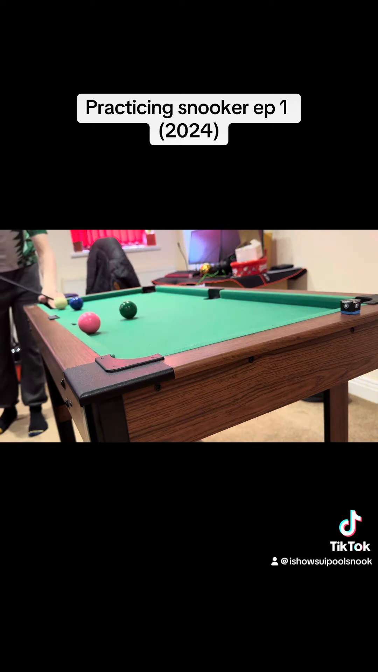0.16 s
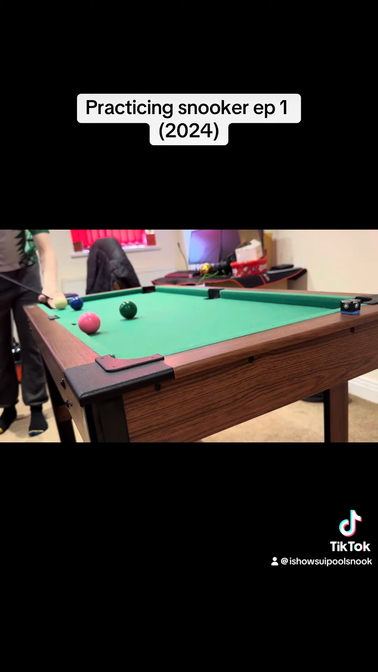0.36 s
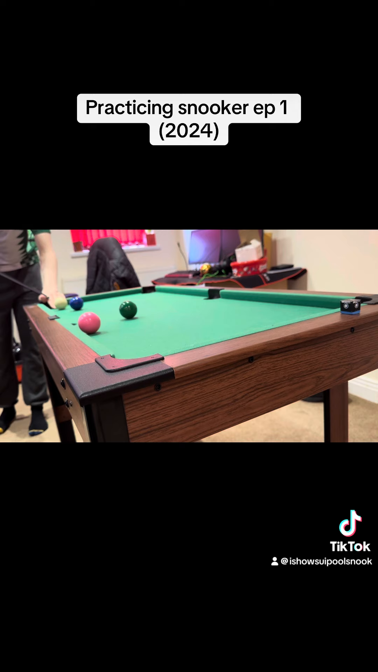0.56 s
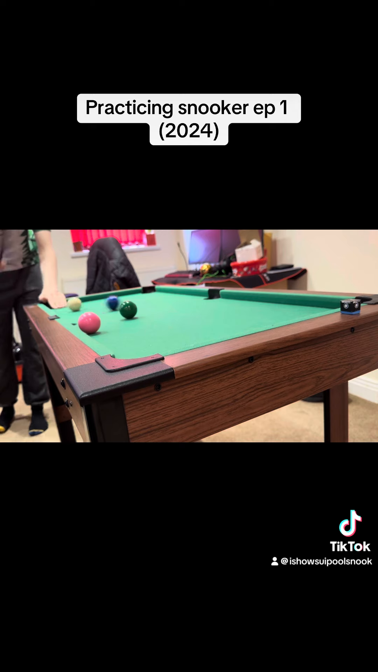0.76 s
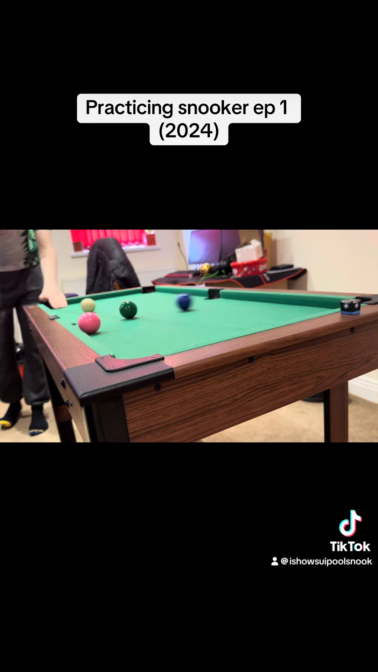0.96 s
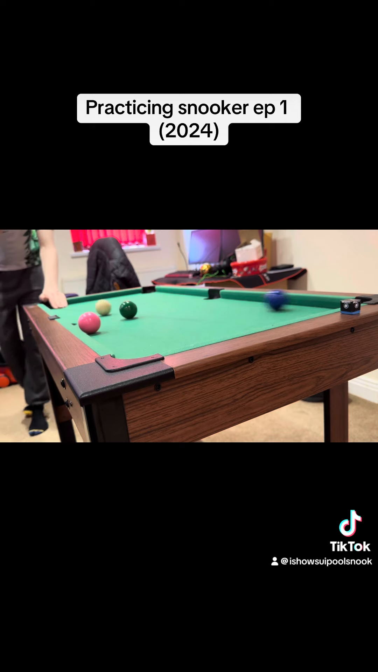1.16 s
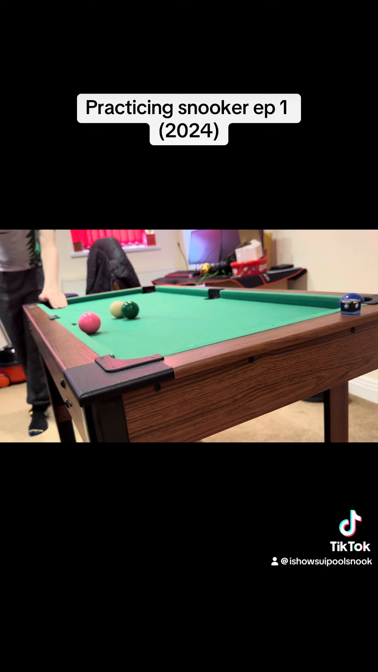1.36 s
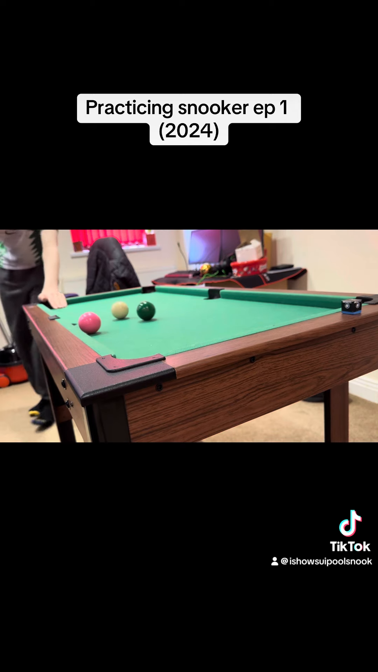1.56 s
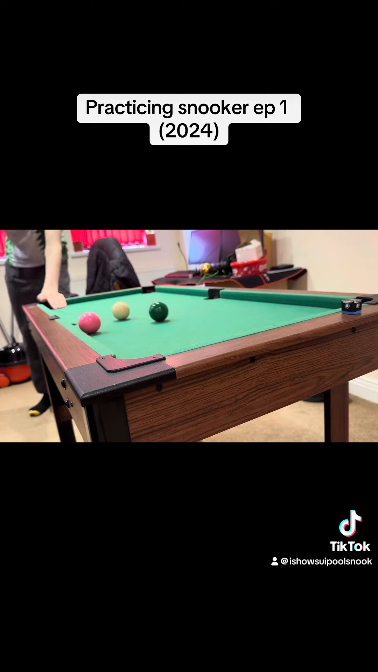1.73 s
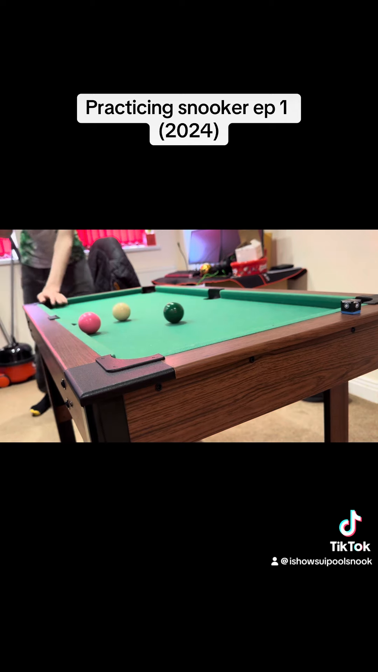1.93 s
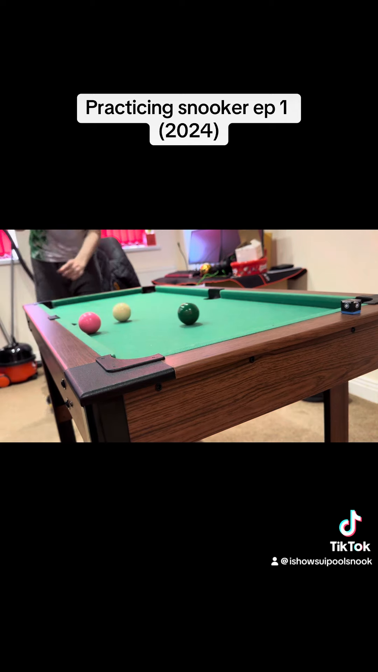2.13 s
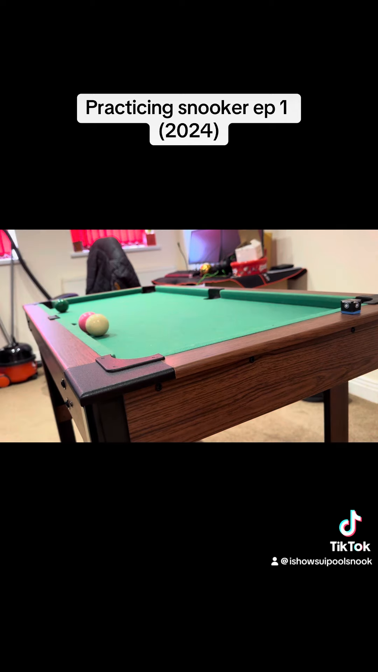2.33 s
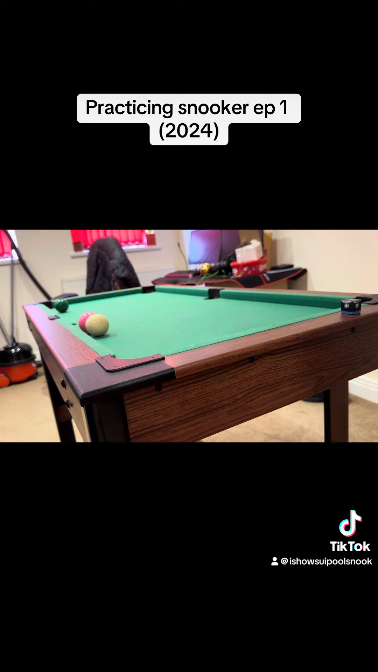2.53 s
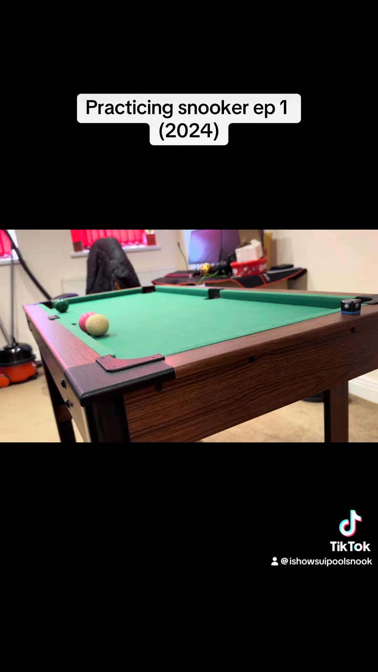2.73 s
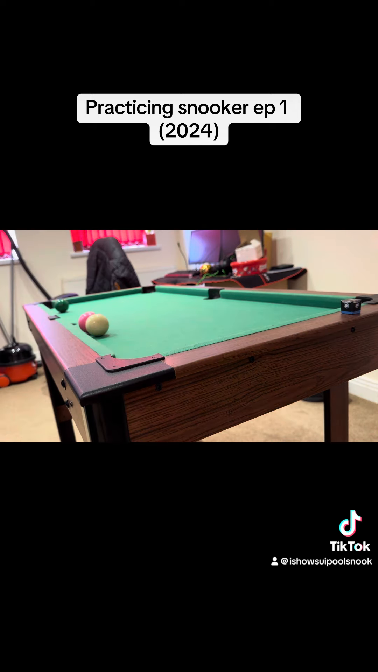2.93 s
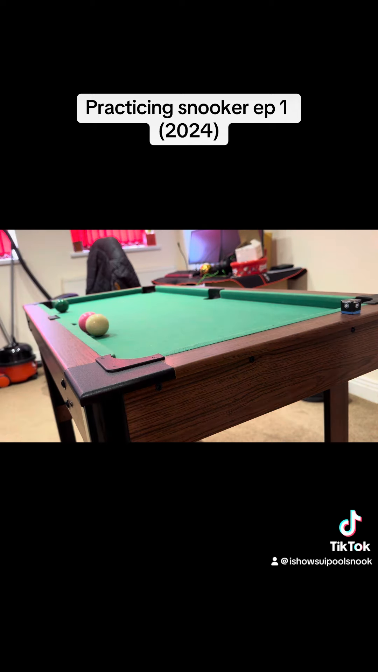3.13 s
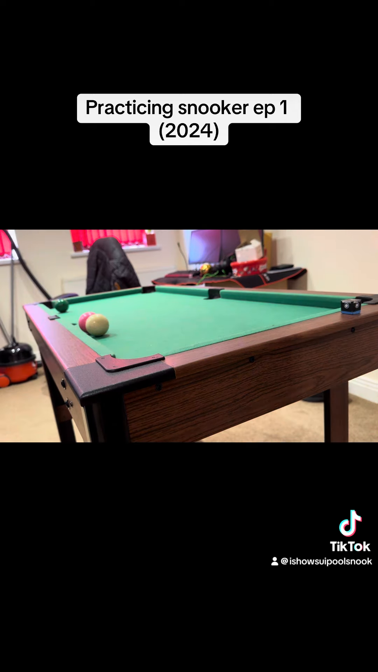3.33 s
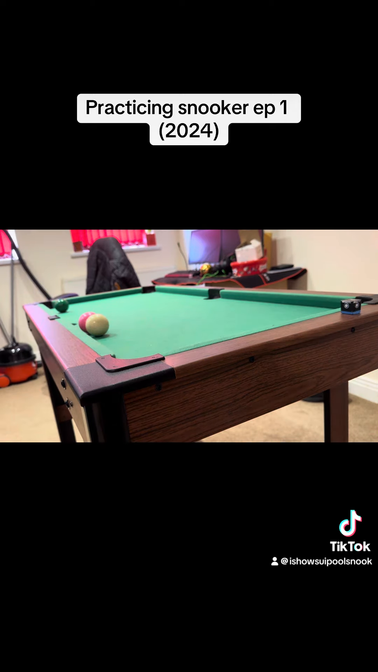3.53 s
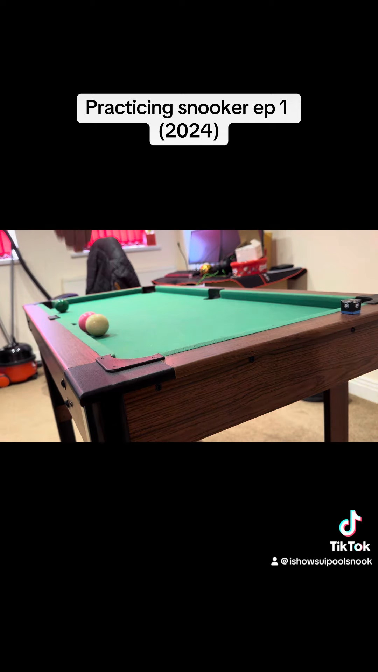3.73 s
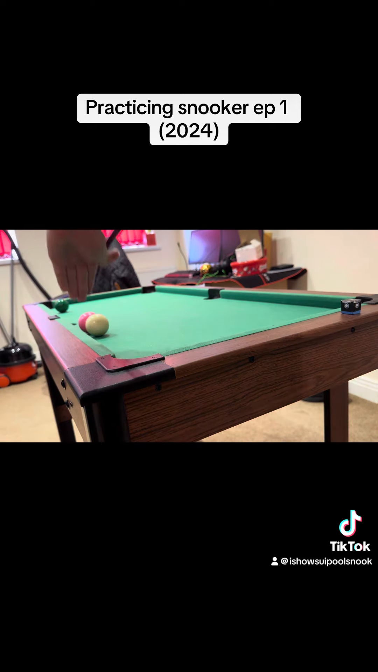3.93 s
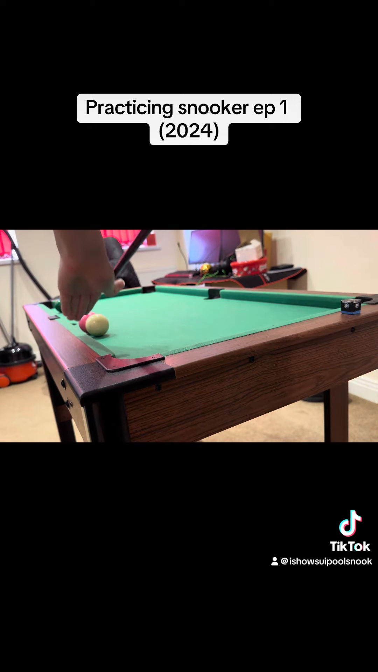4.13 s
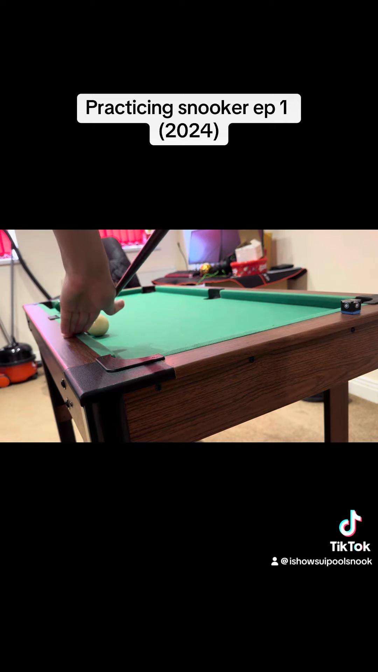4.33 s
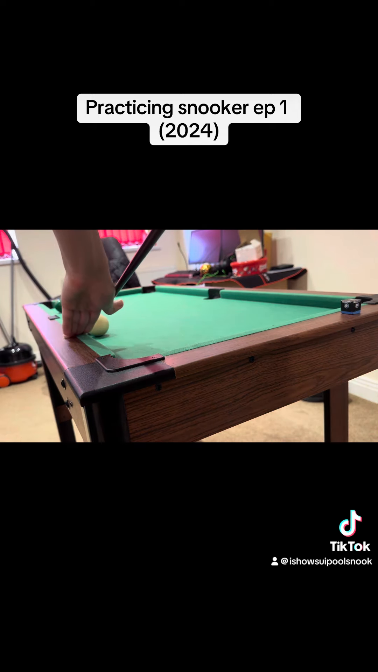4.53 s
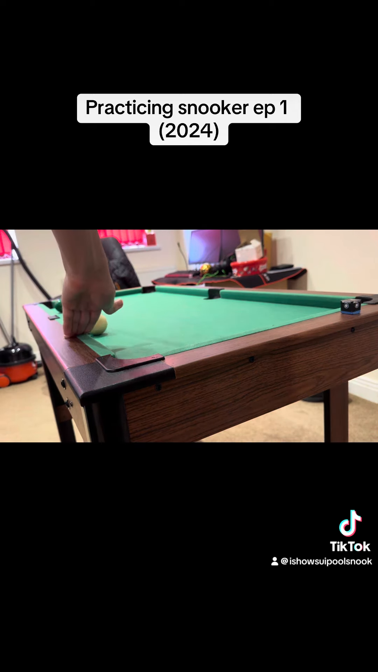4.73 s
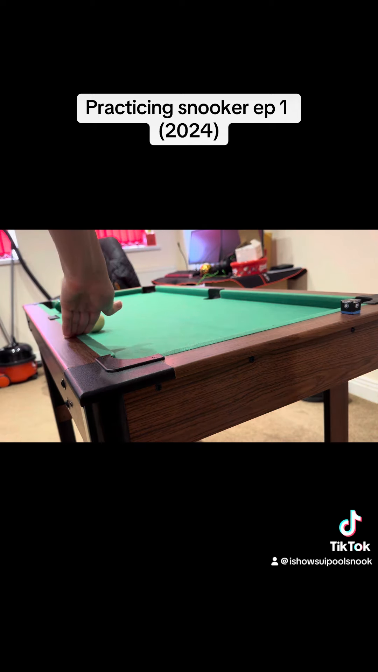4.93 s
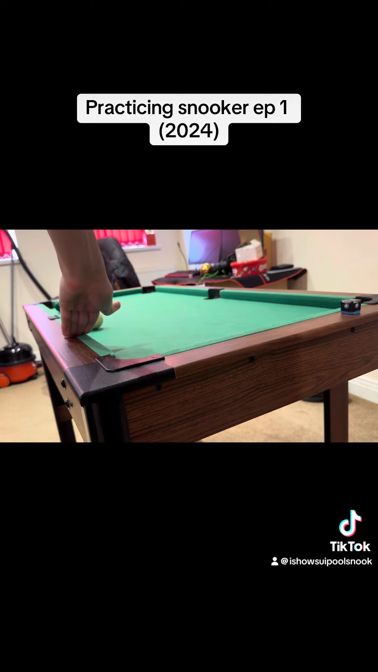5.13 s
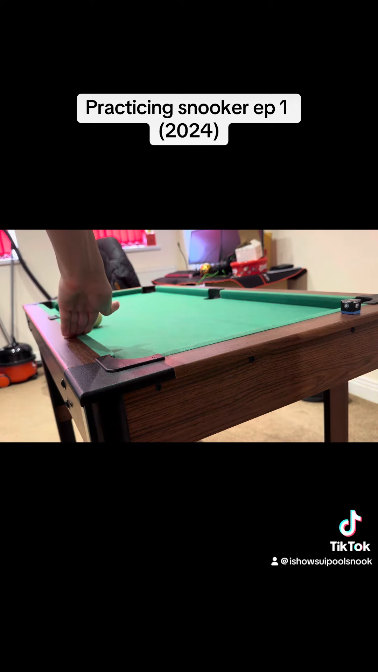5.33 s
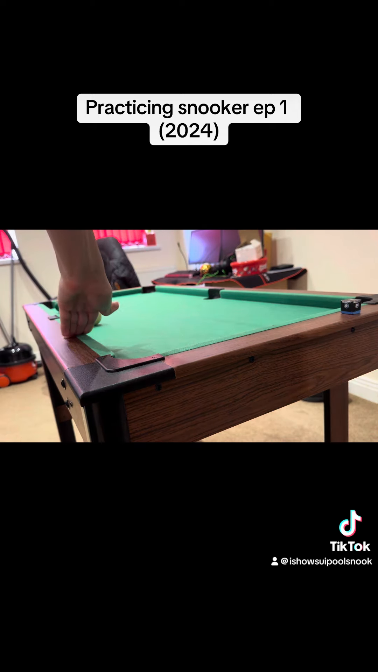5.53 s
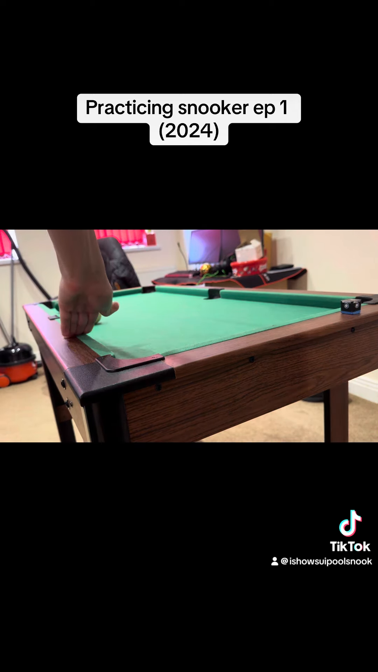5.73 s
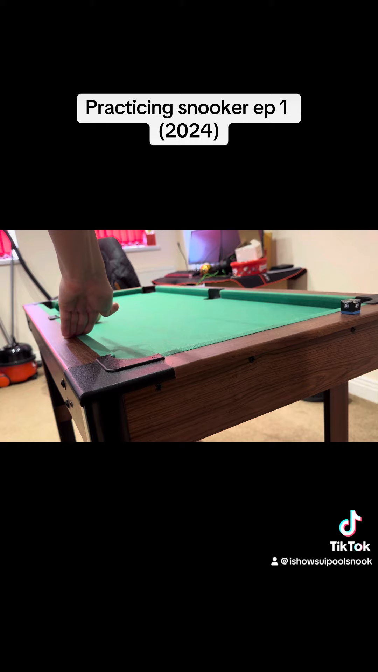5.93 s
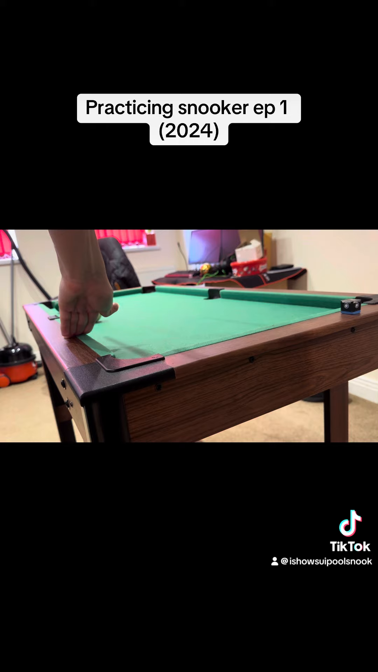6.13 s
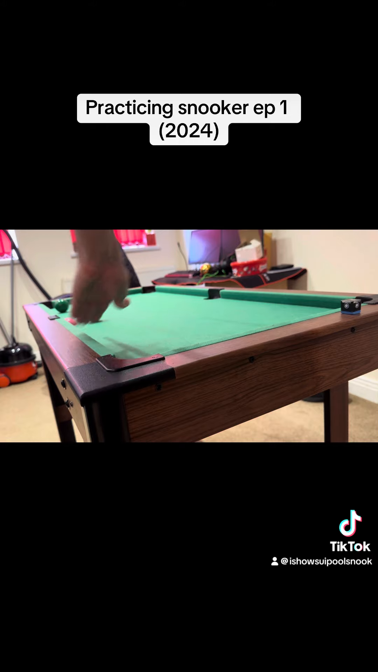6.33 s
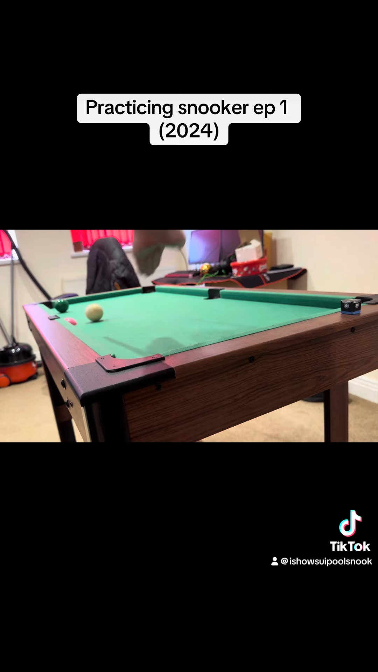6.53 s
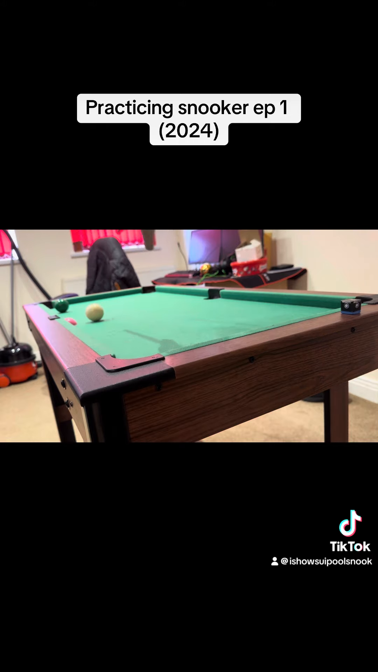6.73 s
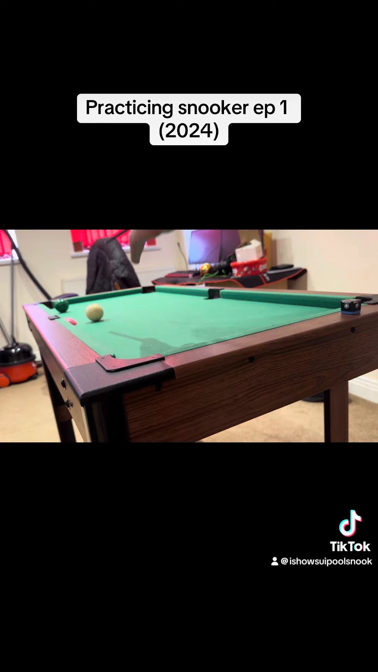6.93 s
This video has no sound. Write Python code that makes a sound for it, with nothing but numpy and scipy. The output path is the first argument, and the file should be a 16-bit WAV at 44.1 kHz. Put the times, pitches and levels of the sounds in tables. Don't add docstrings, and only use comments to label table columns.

```python
import sys
import numpy as np
from scipy import signal
from scipy.fft import rfft, irfft, next_fast_len
from scipy.io import wavfile
from scipy.ndimage import uniform_filter1d

SR = 44100
rng = np.random.default_rng(int(sys.argv[2]) if len(sys.argv) > 2 else 0)


def unload_audio(sound):
    columns = np.transpose(np.atleast_2d(sound))
    steps = np.round(np.clip(columns, -1, 1) * 32767)
    wavfile.write(sys.argv[1], SR, steps.astype(np.int16))


def rack_gain(trim_db):
    fader = np.asarray(trim_db, float)
    return 10 ** (fader / 20)


N = 311787

# (time [s], click peak [dB], click pitch [Hz], body ring [dB], rattle [dB])
CUE_BLOWS = [
    (0.5785, -61.5, 1508, -60.5, -57.5),
    (0.6078, -31.5, 1000, -13.5, -38.5),
]
# (frequency [Hz], width [Hz], level [dB])
CUE_MODES = [(195.7, 3.4, -1), (241.3, 2.3, -3.5), (361, 13, -9), (633, 21, -1), (750.5, 21, -3.5),
             (1000, 90, -8), (1741.6, 200, -22)]


def cue_strike():
    return blows(CUE_BLOWS, CUE_MODES, ring=1.6, rattle_s=0.054, wet_db=6.0, edge_db=-35.5, spread=1.7,
                 rise_s=0.0041, scatter=0, dense_db=-6.5, feed_db=-7.5)


# (time [s], click peak [dB], click pitch [Hz], body ring [dB], rattle [dB])
CLACKS = [
    (0.6373, -8.5, 2852, -25.5, -43.5),
]
# (frequency [Hz], width [Hz], level [dB])
BED_MODES = [(96, 20, -13), (154, 13, -8), (367, 25, -1.5), (458, 30, -8.5), (551.4, 19, -5),
             (860, 40, -12.5)]


def ball_clack():
    return blows(CLACKS, BED_MODES, ring=0.36, rattle_s=0.018, wet_db=6.0, fizz_db=-5.5, edge_db=-14.5,
                 spread=1.4, rise_s=0.0039, pan_db=-2.5)


# (time [s], click peak [dB], click pitch [Hz], body ring [dB], rattle [dB])
POCKET_CLACKS = [
    (1.3217, -6, 2800, -36, -46.5),
    (1.3828, -23.5, 2660, -37.5, -29),
    (1.3862, -27.5, 3400, -39.5, -35),
    (1.4378, -21.5, 2700, -41, -39.5),
]
# (time [s], click peak [dB], click pitch [Hz], body ring [dB], rattle [dB])
POCKET_BLOWS = [(1.2775, -55, 1460, -29.5, -55), (1.292, -57.5, 1214, -32, -58.5),
                (1.3030, -48, 1524, -22, -53), (1.3420, -33, 1774, -27, -35),
                (1.3850, -39.5, 1200, -27.5, -32), (1.4030, -34, 1400, -29.5, -28.5),
                (1.411, -47.5, 1520, -33.5, -40), (1.4400, -38, 1560, -32.5, -30.5),
                (1.4660, -44.5, 2270, -41, -41), (1.4900, -46.5, 2355, -40.5, -41.5),
                (1.5320, -54.5, 3300, -44.5, -62.5), (1.6684, -53, 1250, -41.5, -65.5)]
# (time [s], click peak [dB], click pitch [Hz], body ring [dB], rattle [dB])
BRACKET_BLOWS = [
    (1.2980, -41, 5574, -23, -46),
    (1.3410, -27.5, 7000, -27.5, -37),
]
# (frequency [Hz], width [Hz], level [dB])
POCKET_MODES = [(212.3, 34, -3.5), (377, 22, -6.5), (472, 31, -4.5), (589.4, 46, -6), (722, 73, 0.5),
                (903, 88, -1.5), (1400, 220, -11)]


def pocket_rattle():
    clacks = blows(POCKET_CLACKS, POCKET_MODES, ring=4.0, rattle_s=0.0075, wet_db=-5.0, fizz_db=-8.,
                   edge_db=-47, pan_db=-1.0)
    wood = blows(POCKET_BLOWS, POCKET_MODES, ring=1.4, rattle_s=0.018, wet_db=3.0, fizz_db=-8.5,
                 edge_db=-51, spread=0.62, rise_s=0.005, pan_db=-2.5)
    bracket = blows(BRACKET_BLOWS, POCKET_MODES, ring=1.7, rattle_s=0.01, wet_db=2.5,
                    edge_db=-10.5, spread=1.0, pan_db=-3.0)
    return clacks + wood + bracket


# (time [s], click peak [dB], click pitch [Hz], body ring [dB], rattle [dB])
RAIL_BLOWS = [
    (4.6188, -52, 1990, -32, -35.5),
    (4.6240, -30.5, 2300, -24.5, -39.5),
    (4.6235, -25, 210, -60.5, -72),
]
# (frequency [Hz], width [Hz], level [dB])
RAIL_MODES = [(93.8, 17, -11), (150.8, 81, -12), (197.4, 5, 1.5), (244.5, 29, -4), (389, 52, -11),
              (489.4, 35, -6.5), (723, 180, -9.5), (890, 92, -10), (1100, 91, -22), (1388, 40, -21),
              (1765, 52, -25), (2386, 55, -28)]


def rail_knock():
    return blows(RAIL_BLOWS, RAIL_MODES, ring=1.1, rattle_s=0.012, wet_db=-14.5, feed_db=-4.0,
                 edge_db=-31.5, spread=0.25, rise_s=0.003, dense_db=-7.5, pan_db=-3.0)


# (time [s], click peak [dB], click pitch [Hz], body ring [dB], rattle [dB])
SHOT_BLOWS = [
    (5.8625, -58, 1555, -49.5, -47.5),
    (5.8700, -36.5, 2000, -37, -36),
    (5.8725, -28, 1301, -18.5, -35.5),
    (5.8795, -24, 777, -30, -38.5),
    (5.8890, -37, 2376, -33, -40.5),
    (5.8930, -25, 428.6, -34, -44.5),
]
# (frequency [Hz], width [Hz], level [dB])
SHOT_MODES = [(158, 75, -13), (228.2, 61, -4), (376.6, 54, -0.5), (446.4, 16, -5), (555, 69, -1.5),
              (703, 110, -0.5), (854, 91, 2.5), (1000, 150, 6), (1354, 210, -7.5), (2000, 270, -11),
              (2590, 340, -20.5)]


def second_shot():
    return blows(SHOT_BLOWS, SHOT_MODES, ring=0.75, rattle_s=0.045, wet_db=-2.0, edge_db=-45.0,
                 spread=0.4, dense_db=-6.0, pan_db=-2.14)


# (time [s], click peak [dB], click pitch [Hz], body ring [dB], rattle [dB])
TICKS = [
    (1.047, -68.5, 6000, -58.5, -83.5),
    (1.080, -79.5, 6190, -50, -79.5),
    (1.110, -65.5, 6970, -67.5, -79.5),
    (1.210, -66.5, 7540, -70.5, -83),
    (2.0183, -29.5, 10490, -88.5, -51.5),
    (2.283, -64, 6210, -75, -75),
    (2.826, -73, 5620, -80, -82.5),
    (2.2478, -72, 8820, -58.5, -72),
    (6.2412, -54, 10880, -63.5, -82),
]
# (time [s], click peak [dB], click pitch [Hz], body ring [dB], rattle [dB])
SNAPS = [
    (6.8335, -44.5, 10390, -81.5, -58),
]


def ticks_and_snap():
    ticks = blows(TICKS, POCKET_MODES, ring=2.3, rattle_s=0.039, wet_db=3.0, cycles=4.6,
                  edge_db=-19.0, spread=1.0, pan_db=-2.2)
    snap = blows(SNAPS, POCKET_MODES, ring=3.7, rattle_s=0.01, wet_db=-6.5, cycles=0.71,
                 edge_db=-8, spread=1.0, pan_db=-4.0)
    return ticks + snap


# (frequency [Hz], level [dB])
EDGE_TONE = [(300, -29), (1500, -14.5), (4000, 0), (6500, 6), (8000, -2), (11000, -2), (16000, 0)]
LEAN = 0.22
FEED_T60 = 0.3


def blows(rows, modes, ring, rattle_s, wet_db, cycles=1.4, edge_db=-30, spread=0.63, rise_s=0.0034,
          dense_db=-4, pan_db=-2.0, scatter=1, feed_db=0, fizz_db=0):
    out, t = np.zeros((5, N)), np.arange(SR // 2) / SR
    hz, end = np.fft.rfftfreq(len(t), 1 / SR), np.clip((.45 - t) / .08, 0, 1)
    pan = rack_gain(np.array([[.5], [-.5]]) * pan_db)
    for k, (s, click_db, click_hz, body_db, rattle_db) in enumerate(rows):
        u = t * click_hz - cycles
        delay = np.exp(-2j * np.pi * hz * cycles / click_hz)
        edge = -irfft(rack_gain(read(EDGE_TONE, hz)) * delay, len(t))
        swing = -np.cos(2 * np.pi * u) * np.exp(-2 * ((u - LEAN) / (0.59 * cycles)) ** 2)
        click = rack_gain(click_db) * (swing + rack_gain(edge_db) * edge / abs(edge).max())

        start = .5 * np.arange(len(modes)) + scatter * rng.random(len(modes))
        body = np.zeros(len(t))
        for p, (f, width, db) in zip(start, modes):
            decay = rack_gain(db - 60 * t * width * ring / 2.0) * np.sqrt(width)
            body += decay * np.sin(2 * np.pi * (f * t + p))
        body = body * (1 - np.exp(-t / rise_s))
        body = signal.sosfilt(signal.butter(2, 70, "high", fs=SR, output="sos"), body)
        body = rack_gain(body_db) * body / abs(body).max()
        dense = rack_gain(dense_db) * np.linalg.norm(body) * plate(modes, len(t))

        peak = 1 / (1 + ((hz - click_hz) / (spread * click_hz)) ** 2) ** 1.5
        colour = hz / (hz + 500) * peak + rack_gain(edge_db + fizz_db)
        grit = evened(irfft(rfft(rng.standard_normal(len(t))) * colour, len(t)))
        grit = rack_gain(rattle_db - 60 * (t / rattle_s) ** 1.9) * grit
        smooth = -irfft(colour * delay, len(t))
        smooth = smooth * np.linalg.norm(grit) / np.linalg.norm(smooth)

        add(out[:2], s, (click + body + grit) * pan * end)
        fresh = body * rack_gain(feed_db - 60 * t / FEED_T60)
        feed = fresh + dense + rack_gain(wet_db) * (click + smooth)
        add(out[2 + k % 3][None], s, feed[None] * end)
    return out


def plate(modes, size):
    hz = np.fft.rfftfreq(size, 1 / SR)
    f, width, db = np.transpose(modes)
    ends = hz ** 2 / (hz ** 2 + (1.9 * f[0]) ** 2) / (1 + (hz / (0.74 * f[-1])) ** 4)
    delay = np.exp(-2j * np.pi * hz * 0.0055)
    pulse = irfft(rack_gain(read(np.transpose([f, db]), hz)) * ends * delay, size)
    return pulse / np.linalg.norm(pulse)


def room(hits, live, tail_db):
    wet = [signal.fftconvolve(x[None], room_tail(live, tail_db), axes=1)[:, :N] for x in hits[2:]]
    return hits[:2] + sum(wet)


# (frequency [Hz], t60 [s])
ROOM_T60 = [(100, 1), (210, 0.31), (330, 0.45), (700, 0.54), (2000, 0.51), (4000, 0.41), (6500, 0.52),
            (8500, 0.56), (11000, 0.93), (15000, 0.3)]
# (frequency [Hz], level [dB])
WALLS = [(100, 5), (1000, -1), (5000, 3.5), (7500, -3), (10000, -17.5), (13000, -19), (16000, -17.5)]
# (delay [ms], level [dB])
ECHOES = [(1.3, -16.5), (2.4, -25), (6.0, -17), (8.2, -21.5), (12.5, -20.5), (14.5, -19), (22.0, -17)]
ECHO_HZ = 6000


def room_tail(live, tail_db, shared=0.45, left_db=-2.0):
    taps = np.zeros((3, SR))
    grid = np.arange(300, SR - 20, 20)
    at = grid + rng.integers(0, 20, (3, len(grid)))
    np.put_along_axis(taps, at, rng.choice([-1., 1.], at.shape), 1)
    taps *= 1 - np.exp(-np.arange(SR) / SR / 0.012)
    hz, t, z = signal.stft(taps, SR, nperseg=256)
    z *= rack_gain(read(WALLS, hz)[:, None] - 60 * t / (live * read(ROOM_T60, hz)[:, None]))
    tail = signal.istft(z, SR, nperseg=256)[1][:, :SR]
    tail = shared * tail[2] + np.sqrt(1 - shared ** 2) * tail[:2]
    low = signal.sosfiltfilt(signal.butter(2, 420, fs=SR, output="sos"), tail)
    high = (tail - low) * rack_gain(np.array([[.5], [-.5]]) * left_db)
    tail = high + low.mean(0) * 1.1 + low * 0.24
    tail *= rack_gain(tail_db) / np.linalg.norm(tail[0])
    early = np.zeros((2, SR))
    for ms, db in ECHOES:
        first = round(ms * SR * rng.uniform(.93, 1.07) / 1000)
        early[[0, 1], first + rng.integers(0, 6, 2)] += rack_gain(db)
    return tail + signal.sosfilt(signal.butter(2, ECHO_HZ, fs=SR, output="sos"), early)


# (time [s], level [dB])
ROLL = [
    [(0.8, -53), (1.09, -50), (1.27, -54)],
    [(1.6, -63.5), (1.708, -64.5), (2.006, -79), (2.432, -76), (2.6, -79.5)],
]
# (frequency [Hz], level [dB per Hz])
ROLL_TONE = [(35, -35), (60, -5.5), (141, 1), (177, -0.5), (237, -2), (308, -5), (504, -8.5), (1020, -25.5),
             (1120, -28), (3000, -52.5), (3900, -77), (6600, -120)]


def rolling_balls():
    hz = np.fft.rfftfreq(1024, 1 / SR)
    return level(ROLL) * noise(ROLL_TONE, 1 - .5 * hz / (hz + 300), patchy_db=3.5)


# (time [s], level [dB])
STIR = [(0, -112), (.55, -110), (.9, -96), (1.7, -91), (2.0, -88.5), (2.5, -95), (3.0, -99.5), (3.5, -96.5),
        (4.1, -104), (5.8, -106), (6.3, -100), (6.6, -92), (7.07, -96)]
# (start [s], rise [s], hold [s], level [dB], dying away [dB per s])
SWEEPS = [(1.738, 0.041, 0.032, -82.5, 151.5), (2.244, .008, 0.018, -77.5, 77),
          (2.514, 0.016, 0.039, -74.5, 200), (2.586, 0.019, 0.054, -76.5, 99.5),
          (2.705, 0.01, 0.028, -78.5, 198), (2.9, 0.012, 0.028, -89, 149.5),
          (3.223, 0.02, 0.023, -88.5, 201), (3.456, .02, 0.027, -90.5, 200),
          (3.531, 0.15, 0.053, -68.5, 68), (3.823, 0.037, 0.11, -81.5, 404.5),
          (4.596, 0.012, .01, -77, 304), (5.853, .008, .008, -79, 297.5), (6.6, 0.027, 0.024, -99, 250),
          (6.776, 0.042, .11, -72, 303)]
# (start [s], rise [s], hold [s], level [dB],
# finest hiss relative [dB])
SWISHES = [(1.342, .003, .05, -68.5, -5.5), (0.569, .006, 0.066, -71, -16), (2.02, 0.0029, 0.054, -89, 17),
           (1.04, .04, 0.052, -109.5, -25), (1.191, 0.01, 0.0059, -77, -6.5),
           (1.867, 0.047, 0.047, -96.5, 1), (2.244, 0.016, 0.17, -80.5, -5),
           (2.707, 0.024, 0.026, -81, -18), (2.82, 0.032, 0.085, -86.5, -16),
           (2.992, 0.024, 0.036, -77.5, 2), (3.403, 0.046, 0.031, -83, -7.5),
           (4.501, 0.088, 0.032, -78.5, -22), (6.204, 0.023, 0.013, -84.5, 1),
           (6.393, 0.064, .1, -85.5, -35), (6.785, .01, .02, -86.5, 0), (6.824, 0.003, 0.031, -81, 0.5),
           (6.879, 0.034, 0.028, -93, -14.5), (6.981, 0.048, 0.069, -82.5, -12)]
# (frequency [Hz], level [dB])
RUSTLE_TONE = [(500, -22), (900, -10), (1700, -4), (2500, -2), (3400, 0), (4300, -5), (6000, -12),
               (8000, -18), (9500, -40)]
# (frequency [Hz], level [dB])
HISS_TONE = [(2500, -15.5), (4500, -16.5), (7000, -2), (11000, 5), (12800, -9.5), (13600, -26.5)]
# (frequency [Hz], level [dB])
TOP_TONE = [(12800, -15.5), (14000, 6.5), (15000, -1.5), (15800, 0.5), (16200, -30)]
STIR_HISS_DB, SWEEP_HISS_DB = 4.5, -15.5
SWISH_FALL, CRISP_FALL = 79, 500.


def clothes():
    cloth = noise(RUSTLE_TONE, 0.064, patchy_db=1.3, size=512)
    hiss = noise(HISS_TONE, -0.36, patchy_db=2.0, size=512)
    finest = noise(TOP_TONE, -.3, patchy_db=2.5, size=512)
    stir = level([STIR])
    sweep = swells(SWEEPS, [r[4] for r in SWEEPS])
    fine = rack_gain(STIR_HISS_DB) * stir + rack_gain(SWEEP_HISS_DB) * sweep + swells(SWISHES, SWISH_FALL)
    crisp = swells(SWISHES, CRISP_FALL, [r[4] for r in SWISHES])
    return (stir + sweep) * cloth + fine * hiss + crisp * finest


# (time [s], level [dB])
SQUEAK = [
    (2.255, -88.5),
    (2.28, -80),
    (2.36, -68),
    (2.42, -75.5),
    (2.46, -91.5),
]
# (frequency [Hz], width [Hz], level [dB])
SQUEAK_BANDS = [(412, 49, 0), (1600, 87, -14), (4300, 160, -17), (5230, 140, -23), (5730, 250, -11.5),
                (6400, 130, -17), (7070, 170, -13)]


def wood_squeak():
    return level([SQUEAK]) * bands(SQUEAK_BANDS)


# (time [s], level [dB])
THUDS = [(.62, -50), (0.789, -57), (.96, -59), (1.119, -59), (1.22, -56), (1.43, -58), (1.949, -60),
         (2.25, -55.5), (2.691, -61), (2.729, -61), (2.85, -59.5), (2.95, -65.5), (3.241, -67.5),
         (3.429, -67.5), (3.56, -64), (3.67, -68.5), (4.63, -56.5), (5.891, -63), (6.54, -70), (6.69, -70),
         (6.87, -67)]
THUD_HZ, THUD_RISE_S, THUD_T60 = 56., 0.008, 0.23


def thuds():
    out, t = np.zeros((1, N)), np.arange(SR // 3) / SR
    shape = (1 - np.exp(-t / THUD_RISE_S)) * rack_gain(-60 * t / THUD_T60)
    for (s, db), bend in zip(THUDS, rng.uniform(-0.24, 1, len(THUDS))):
        swing = shape * np.sin(2 * np.pi * THUD_HZ * (1 + 0.11 * bend) * t)
        add(out, s, (rack_gain(db + 1.5) * swing / abs(swing).max())[None])
    return out


def floorboards():
    tone = [(18, -21.5), (30, -12.5), (60, 5.5), (90, -7.0), (140, -36)]  # (Hz, dB)
    stir = level([STIR])
    return rack_gain(-69.5) * (stir / stir.max()) ** 0.37 * noise(tone, 0.92, patchy_db=6.5, size=4096)


# (time [s], level [dB])
FAN = [
    (2.6, -89.5),
    (3.1, -78),
    (4.2, -79),
    (5.0, -83),
    (5.4, -70),
    (7.07, -69),
]


def fan_motor():
    return level([FAN]) * np.sin(2 * np.pi * 117 * np.arange(N) / SR)


# (time [s], level [dB])
FLOOR = [(0, -72.5), (.45, -73.5), (.7, -63.5), (2.1, -66.5), (2.8, -65.5), (3.6, -67), (4.4, -70.5),
         (5.5, -68.5), (7.07, -67)]
# (frequency [Hz], level [dB per Hz])
FLOOR_TONE = [(35, -40), (60, -11), (70, -16), (107, -5.5), (134, -16.5), (205, -9.5), (229, -21),
              (293, -18), (383, -24.5), (448, -19.5), (560, -30), (613, -25), (1250, -33.5), (1830, -39.5),
              (12500, -58), (16200, -89.5), (22000, -120)]
# (frequency [Hz], likeness [0-1])
SAME = [(60, 0.94), (180, 0.61), (550, 0.68), (1650, 0.083), (4970, 0.066), (15000, 0.17)]
# (frequency [Hz], width [Hz], level [dB])
HUM = [(48, 6, -6), (104, 15, 0), (204, 24, -4), (447, 4, -19), (575, 12, -17)]
# (frequency [Hz], level [dB])
MAINS = [(100, -1), (200, -8.5), (300, -22), (600, -18.5)]


def room_floor():
    hz = np.fft.rfftfreq(1024, 1 / SR)
    floor = rack_gain(-4.0) * noise(FLOOR_TONE, read(SAME, hz), patchy_db=2.5)
    floor = floor + rack_gain(-11.5) * bands(HUM)
    for f, db in MAINS:
        floor = floor + rack_gain(db) * np.sin(2 * np.pi * (f * np.arange(N) / SR + rng.random()))
    return level([FLOOR]) * floor


def evened(x):
    return x / np.sqrt(np.mean(x ** 2) + 1e-20)


def read(points, hz):
    f, value = np.transpose(points)
    return np.interp(np.log(hz + 1), np.log(f + 1), value)


def add(mix, s, sound):
    part = mix[:, round(s * SR):][:, :sound.shape[1]]
    part += sound[:, :part.shape[1]]


def level(tables):
    t, out = np.arange(N) / SR, np.zeros(N)
    for rows in tables:
        s, db = np.transpose(rows)
        fade = np.clip(np.minimum(t - s[0], s[-1] - t) / 0.0096 + 1, 0, 1)
        out += fade * rack_gain(np.interp(t, s, db))
    return out


def swells(rows, fall, extra_db=0):
    start, rise, hold, db = np.transpose(rows)[:4, :, None]
    t = np.arange(0, N / SR + .01, .001)
    fading = np.reshape(fall, (-1, 1)) * np.clip(t - start - rise - hold, 0, 9)
    peak_db = db + np.reshape(extra_db, (-1, 1))
    gain = np.clip((t - start) / rise, 0, 1) ** 2 * rack_gain(peak_db - fading)
    return np.interp(np.arange(N) / SR, t, gain.sum(0))


def noise(tone, same, patchy_db, size=1024):
    frames, hz = 4 * N // size + 5, np.fft.rfftfreq(size, 1 / SR)
    a, b, c, d, patches = rng.standard_normal((frames, len(hz), 5)).T
    patches = uniform_filter1d(uniform_filter1d(patches, size=8, axis=0), size=8, axis=1)
    same = np.clip(same * np.ones(len(hz)), -1, 1)[:, None]
    left = a + 1j * b
    z = np.array([left, same * left + np.sqrt(1 - same ** 2) * (c + 1j * d)])
    f, db = np.transpose(tone)
    tone_db = np.interp(np.log(hz + 1), np.log(f + 1), db, left=-80, right=-80)
    z *= rack_gain(tone_db[:, None] + patchy_db * evened(patches))
    return evened(signal.istft(z, nperseg=size, noverlap=3 * size // 4)[1][:, :N])


def bands(table):
    hz = np.fft.rfftfreq(N, 1 / SR)
    shape = sum(rack_gain(db) / np.sqrt(w) * np.exp(-((hz - f) / w) ** 2) for f, w, db in table)
    return evened(irfft(rfft(rng.standard_normal(N)) * shape, N))


def scene():
    far = cue_strike() + ball_clack() + pocket_rattle()
    near = rail_knock() + second_shot() + ticks_and_snap()
    hits = room(far, live=0.96, tail_db=-8.5) + room(near, live=0.82, tail_db=-6.0)
    moving = rolling_balls() + clothes() + wood_squeak() + thuds() + floorboards()
    return hits + moving + fan_motor() + room_floor()


def band_limit(x):
    return signal.sosfilt(signal.butter(12, 16960, fs=SR, output="sos"), x)


# (frequency [Hz], width [Hz], depth [dB])
NOTCHES = [
    (8885, 700, -29),
    (13310, 490, -16.5),
]


def record(dry):
    size = next_fast_len(N + 4096)
    hz = np.fft.rfftfreq(size, 1 / SR)
    colour_db = sum(db * np.exp(-((hz - f) / w) ** 4) for f, w, db in NOTCHES)
    colour_db = colour_db - 14 * np.clip((hz - 15700) / 200, 0, 1)
    colour = rack_gain(colour_db) * (hz < 16900) * (hz > 15)
    x = irfft(rfft(dry, size) * colour, size)[:, :N]
    x[0] = np.roll(x[0], 1)
    return band_limit(x)


dry = scene()
out = record(dry)
unload_audio(out)
```